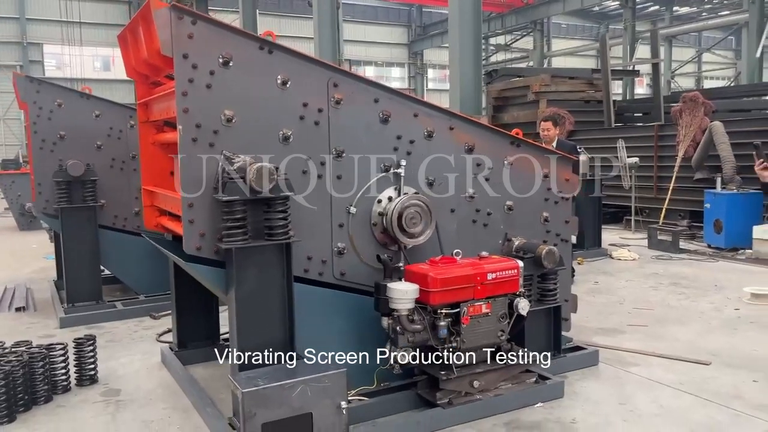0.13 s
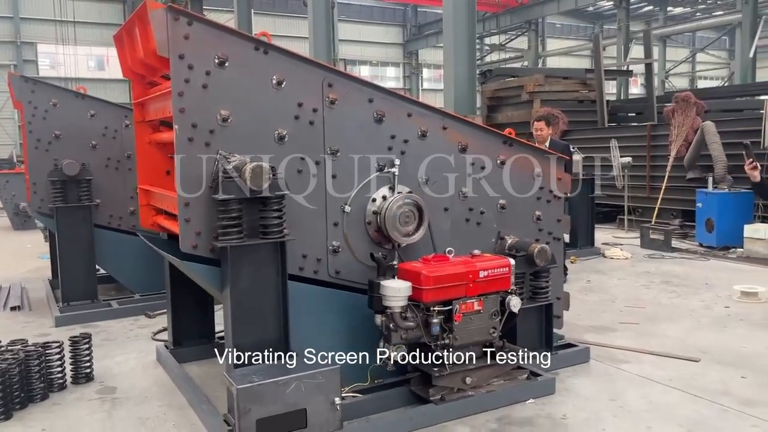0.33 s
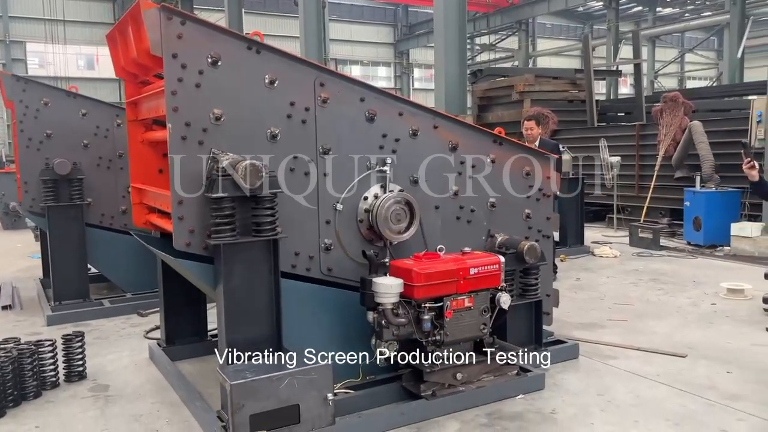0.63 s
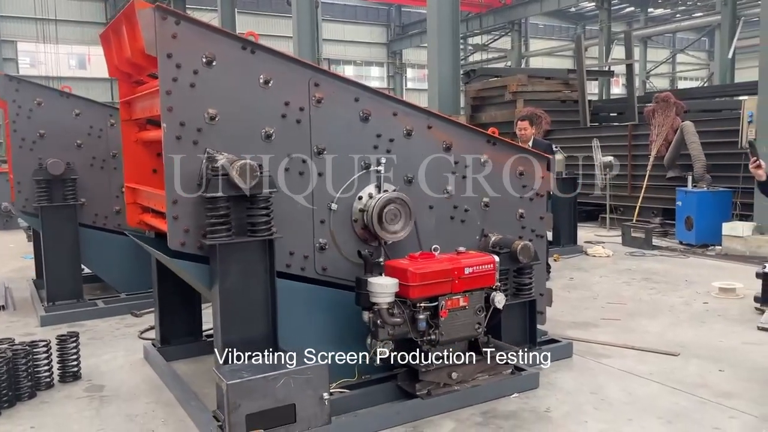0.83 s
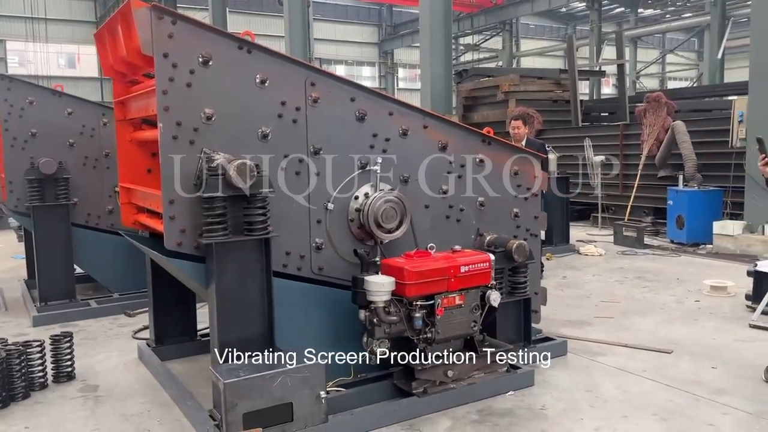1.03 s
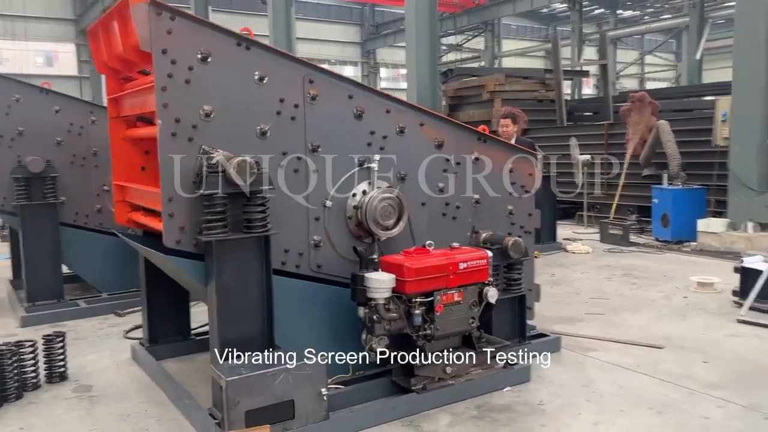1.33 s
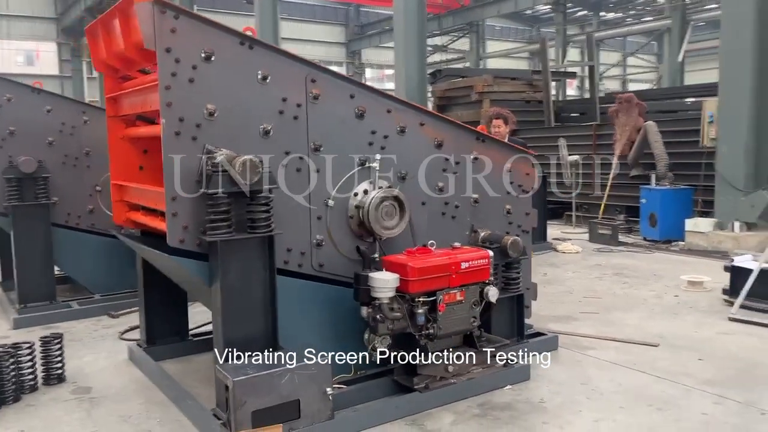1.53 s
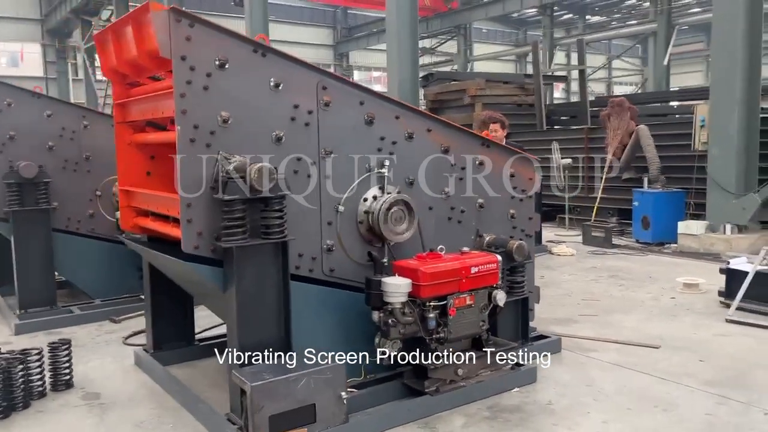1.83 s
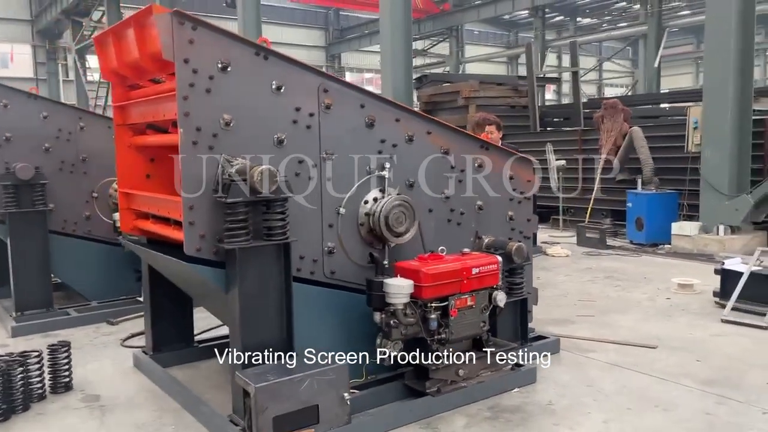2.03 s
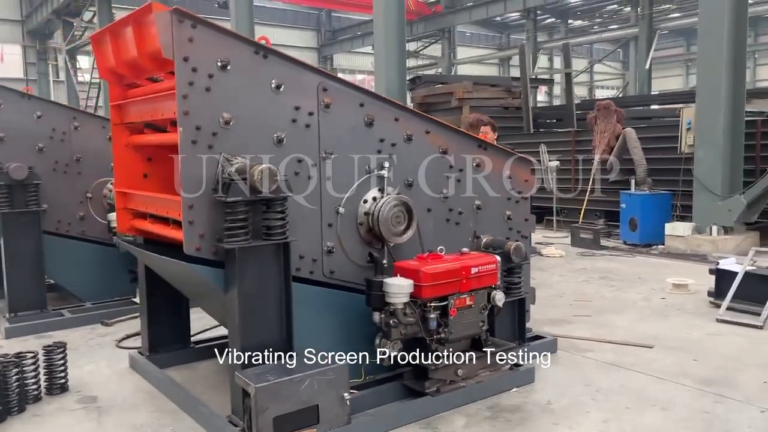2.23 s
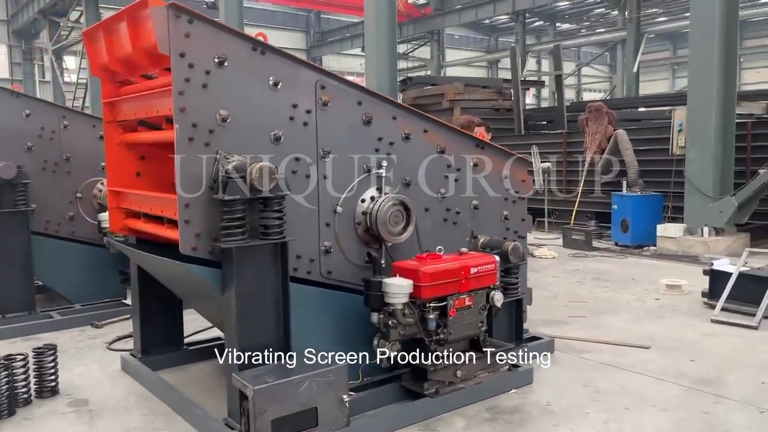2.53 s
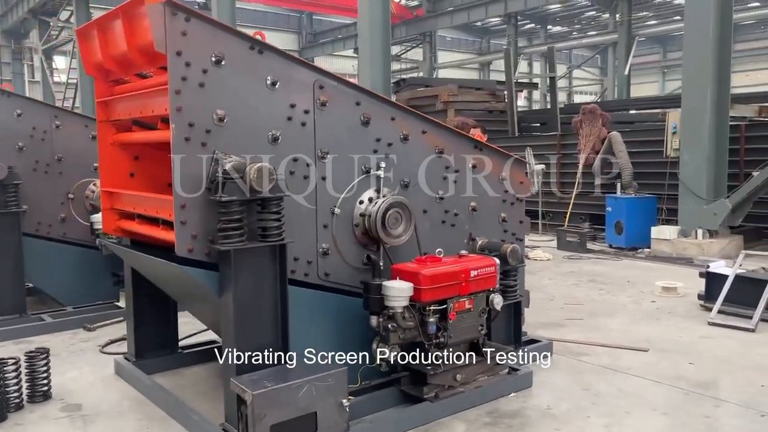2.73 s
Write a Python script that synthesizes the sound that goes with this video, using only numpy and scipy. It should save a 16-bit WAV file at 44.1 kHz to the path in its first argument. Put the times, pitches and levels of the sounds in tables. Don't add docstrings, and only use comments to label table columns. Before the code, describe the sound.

A diesel engine's fast hard knocking with loose steel clatter and low rumble in a factory hall

```python
import sys
import numpy as np
from scipy import signal
from scipy.fft import rfft, irfft, next_fast_len
from scipy.io import wavfile
from scipy.ndimage import uniform_filter1d, map_coordinates

SR = 44100
rng = np.random.default_rng(int(sys.argv[2]) if len(sys.argv) > 2 else 0)


def amplitude_ratio(level_db):
    exponent = np.asarray(level_db, float) / 20
    return 10 ** exponent


def int16_out(signal):
    q = np.round(np.clip(np.atleast_2d(signal).T, -1, 1) * 32767)
    wavfile.write(sys.argv[1], SR, q.astype(np.int16))


N = 127449


def along(points, hz):
    f, v = np.transpose(points)
    return np.interp(np.log(hz + 1), np.log(f + 1), v)


def filtered(x, response):
    m = next_fast_len(N + SR // 2)
    return irfft(rfft(x, m) * response(np.fft.rfftfreq(m, 1 / SR)), m)[..., :N]


def noise(tone):
    patchy_db, skirt_db = 2, 55
    z = signal.stft(rng.standard_normal((2, N + SR // 10)), nperseg=256)[2]
    field = rng.standard_normal(z.shape[1:])
    field = uniform_filter1d(uniform_filter1d(field, 3, 0), 9, 1)
    white = signal.istft(z * amplitude_ratio(patchy_db * field / field.std()), nperseg=256)[1][:, :N]
    envelope = [(5, tone[0][1] - skirt_db)] + tone + [(17000, -90)]
    x = filtered(white, lambda hz: amplitude_ratio(along(envelope, hz)))
    return x / np.sqrt(np.mean(x ** 2))


def wobble(rate):
    return map_coordinates(rng.standard_normal(6000), [np.arange(N) * rate / SR])


def laid(times, shapes):
    out = np.zeros(shapes.shape[1:-1] + (N + 2 * SR,))
    for s, shape in zip(times, shapes):
        start = round((s + 1) * SR)
        out[..., start:][..., :shape.shape[-1]] += shape
    return out[..., SR:SR + N]


# (time [s], lag [ms])
HUNT = [(0, 0), (.39, .2), (.6, -.4), (.87, .5), (1.15, 1.5), (1.54, .4), (1.95, 1.8), (2.2, .8),
        (2.45, -.6), (2.89, .4)]
# (time [s], level [dB])
LOAD = [(0, -1.5), (.2, 0.5), (.39, 2.5), (.46, -2), (.7, -2), (.95, 0), (1.05, 2.5), (1.17, 1.5),
        (1.37, 0.5), (1.44, -4.5), (1.65, 0.5), (1.78, 0.5), (1.93, 2), (2.12, 1.5), (2.28, 1), (2.34, -4),
        (2.55, 0), (2.85, 1.5)]


def firings():
    first_s, cycle_s = .0340, .06978
    s = first_s + cycle_s * np.arange(-4, 42)
    s = s + np.interp(s, *np.transpose(HUNT)) / 1000
    return s, np.interp(s, *np.transpose(LOAD))


def hall(x):
    t60_s, level_db, dull_hz = 0.56, -7, 4770
    t = np.arange(SR // 2) / SR
    tail = rng.standard_normal((2, len(t))) * amplitude_ratio(-60 * t / t60_s) * (t > .008)
    wet = signal.fftconvolve(x[:1], tail / np.linalg.norm(tail[0]), axes=1)[:, :N]
    return amplitude_ratio(level_db) * filtered(wet, lambda hz: 1 / (1 + 1j * hz / dull_hz))


# (frequency [Hz], level [dB])
RUMBLE = [(20, -14.5), (90, -3), (170, -2), (250, -9.5), (300, -4), (370, -12), (500, -15), (800, -29.5)]


def frame_rumble():
    return amplitude_ratio(-34 + 1.45 * wobble(12)) * noise(RUMBLE)


# (frequency [Hz], level [dB])
RATTLE_TONE = [(300, -10), (650, -1.5), (900, 1.5), (1200, -5), (2800, -5), (5000, -14.5), (13000, -33),
               (15500, -46)]


def steel_rattle():
    level_db, fade_db, growth = -35.5, 6, 0.18
    s, load_db = firings()
    t = np.arange(N) / SR
    turn = np.interp(t, s, np.arange(len(s))) % 1
    level = level_db - fade_db * (turn - .5) + growth * np.interp(t, s, load_db)
    level = level + 1.47 * wobble(300) + 0.81 * wobble(25.4)
    return amplitude_ratio(level) * noise(RATTLE_TONE)


def ringing(modes, times, db, rise_s, scatter_db, slip, shape):
    hz, level_db, t60 = np.transpose(modes)
    t = np.arange(SR // 4) / SR
    decay = amplitude_ratio(level_db[:, None] - 60 * t / t60[:, None]) * (1 - np.exp(-t / rise_s))
    fall = decay * np.exp(2j * np.pi * hz[:, None] * t)
    draw = rng.standard_normal((len(times), 2, len(hz), 2))
    size = shape * amplitude_ratio(db[:, None, None] + scatter_db * draw[..., 0])
    size = size * np.exp(1j * slip * draw[..., 1] * [[1], [4]])
    return laid(times, (size @ fall).imag)


# (frequency [Hz], level [dB], T60 [s])
MUFFLER = [(57.6, -13.5, 0.67), (73.5, -12, 0.39), (85.1, 0, 0.34), (99.1, -7.5, 0.44), (115.3, -9, 0.39),
           (142.96, -7, .4), (171.2, -12, .3), (185.4, -11, 0.46), (214.8, -12, 0.39), (243.6, -15, 0.38),
           (296.4, -14.5, 0.13), (329, -22.5, 0.31)]


def exhaust_thump():
    s, load_db = firings()
    return ringing(MUFFLER, s + .024, -24 + 0.35 * load_db, rise_s=0.0053, scatter_db=1.6, slip=0.16, shape=0.97)


# (frequency [Hz], level [dB], T60 [s])
BLOCK = [(717.7, -4, 0.18), (742.5, -3, 0.31), (783, 1.5, 0.17), (820, 3, 0.2), (877, -9, 0.15),
         (884.5, -5, .16), (942, -6, .1), (1016, 2, 0.13), (1064, -0.5, 0.12), (1382, 0.5, 0.11),
         (1534, 4.5, 0.077), (1700, -5, 0.12), (2098, -0.5, 0.079), (2430, -1.5, .07)]


def block_ring():
    s, load_db = firings()
    phase = np.exp(2j * np.pi * rng.random(len(BLOCK)))
    return ringing(BLOCK, s, -36 + load_db, rise_s=0.0021, scatter_db=2, slip=0.46, shape=phase)


def burst(tone, after_s, rise_s, t60_s, db, growth):
    grit_db = -0.5
    s, load_db = firings()
    t = np.arange(SR // 8) / SR
    draw = rng.standard_normal((len(s), 2))
    rise = np.sin(np.pi / 2 * np.clip(t / rise_s, 0, 1)) ** 2
    shape = rise * amplitude_ratio(-60 * np.clip(t - rise_s, 0, None) / t60_s)
    times = s + after_s + 0.00093 * draw[:, 0]
    level = amplitude_ratio(db + growth * load_db + 1.4 * draw[:, 1])
    gate = laid(times, level[:, None] * shape)
    return gate * amplitude_ratio(grit_db * wobble(700)) * noise(tone)


# (frequency [Hz], level [dB])
VALVE_TONE = [(500, -22), (1500, -5), (2600, -4.5), (5000, -13.5), (7500, -4.5), (10000, -11.5),
              (13800, -11), (15500, -29)]


def valve_gear():
    snap = burst(VALVE_TONE, after_s=.0145, rise_s=.0055, t60_s=.058, db=-34, growth=2.1)
    seat = burst(VALVE_TONE, after_s=.053, rise_s=.004, t60_s=.07, db=-46, growth=1.2)
    return snap + seat


# (time after firing [s], frequency [Hz], length [s], peak level [dB])
TONK = [
    (-0.00157, 985, 0.0076, -25),
    (.0035, 994, 0.0058, -28),
    (-.001, 1501, 0.0067, -29.5),
    (-.001, 2490, 0.0063, -33),
    (-.001, 3250, 0.0038, -34.5),
]


def hollow_knock():
    s, load_db = firings()
    t = np.arange(SR // 50) / SR
    out = 0
    for after, hz, length, db in TONK:
        packet = np.sin(np.pi * np.clip(t / length, 0, 1)) ** 2 * np.exp(2j * np.pi * hz * t)
        draw = rng.standard_normal((len(s), 2, 2))
        size = amplitude_ratio(db + load_db[:, None] + 0.58 * draw[..., 0])
        size = size * np.exp(1j * draw[..., 1] * [.3, 3])
        out = out + laid(s + after, (size[..., None] * packet).imag)
    return out


# (frequency [Hz], level [dB])
KNOCK_TONE = [(600, -12), (1200, -3.5), (2200, 0.5), (3200, 1), (4500, -9), (8500, -6.5), (13500, -18),
              (15500, -25)]


def combustion_knock():
    return burst(KNOCK_TONE, after_s=-.0025, rise_s=.0045, t60_s=.052, db=-30, growth=1.2)


def engine():
    return block_ring() + hollow_knock() + combustion_knock() + valve_gear()


# (frequency [Hz], level [dB])
WIDTH = [(60, -24), (300, -14), (800, -11), (1200, -5), (1550, -0.5), (1800, -10.5), (2150, -24),
         (2550, -7.5),
         (3200, -2.5), (5000, -5.5), (6900, 0.5), (7700, 12), (9100, 13.5), (9900, -0.5), (11800, -14),
              (15000, -2)]
# (frequency [Hz], share [0-1])
LEAN = [(60, 0.3), (500, .55), (1500, 0.4), (2400, 0), (4500, 0.57), (7500, 0.1), (15000, .02)]


def scene():
    lag_share = .6
    bright = engine()
    near, other = bright + hall(bright) + exhaust_thump() + steel_rattle() + frame_rumble()

    def ratio(hz):
        return amplitude_ratio(along(WIDTH, hz))

    def side_response(hz):
        lean = np.clip(along(LEAN, hz), 0, 1)
        incoherent = np.sqrt(np.clip(1 - lean ** 2 - lag_share ** 2, .01, 1))
        return ratio(hz) / np.hypot(1, ratio(hz)) * [lean + 1j * lag_share, incoherent]

    mid = filtered(near, lambda hz: 1 / np.hypot(1, ratio(hz)))
    side = filtered(np.array([near, other]), side_response).sum(0)
    return np.array([mid + side, mid - side])


def low_pass(x):
    return signal.sosfilt(signal.butter(12, 15720, fs=SR, output="sos"), x)


def record(dry):
    cut_hz, floor_db, top_hz = 53, -3, 15650

    def response(hz):
        floor = amplitude_ratio(floor_db)
        high_pass = 1 / np.sqrt(1 + (cut_hz / (hz + 1)) ** 30)
        return (floor + high_pass) / (1 + floor) * (hz < top_hz)

    return low_pass(filtered(dry, response))


dry = scene()
out = record(dry)
int16_out(out)
```